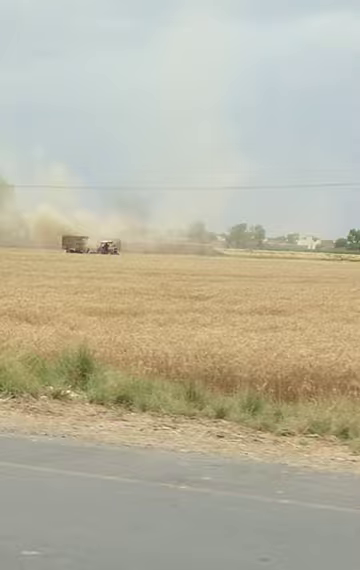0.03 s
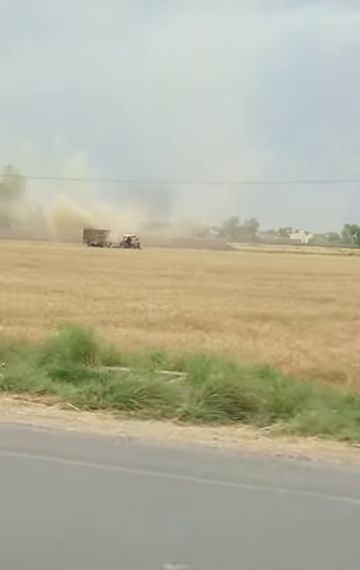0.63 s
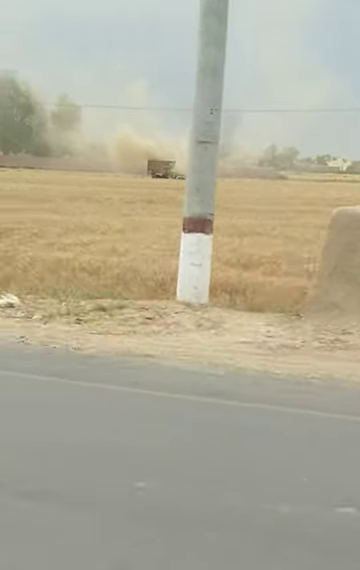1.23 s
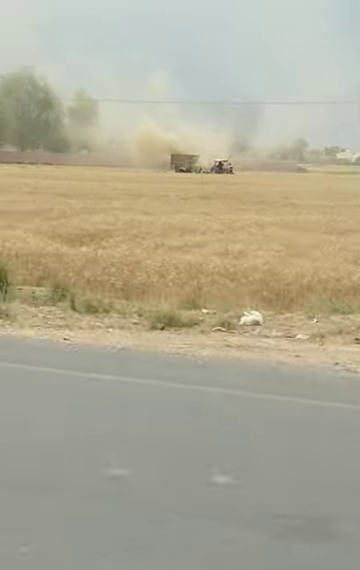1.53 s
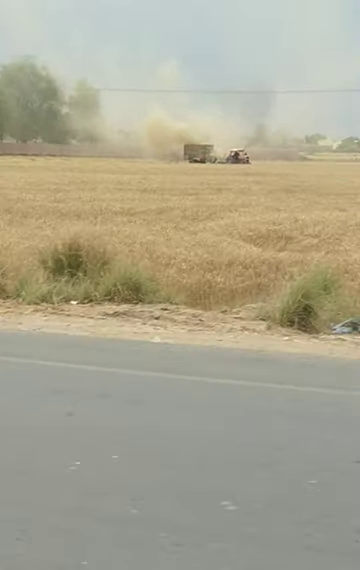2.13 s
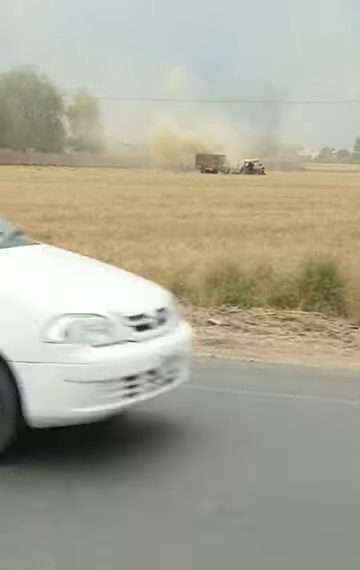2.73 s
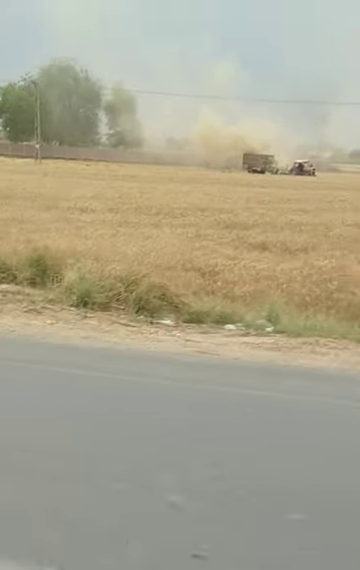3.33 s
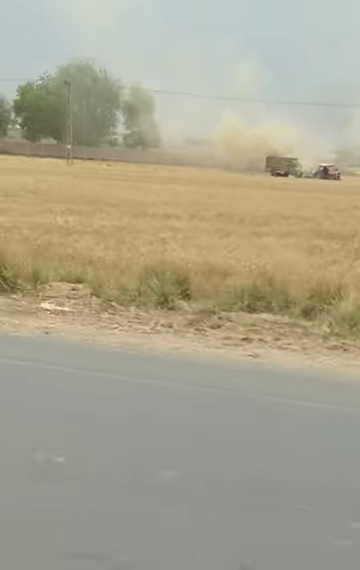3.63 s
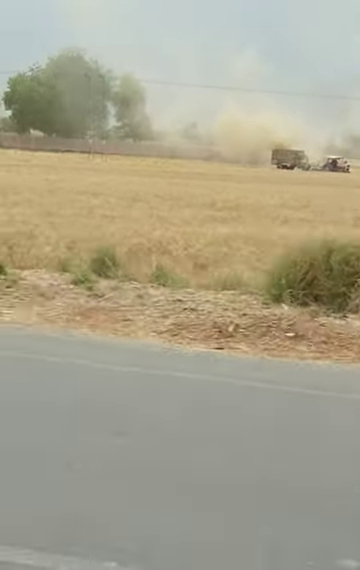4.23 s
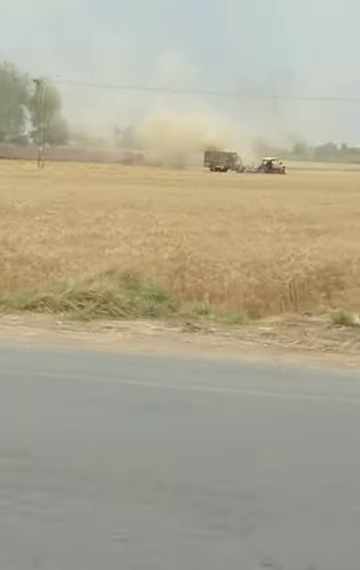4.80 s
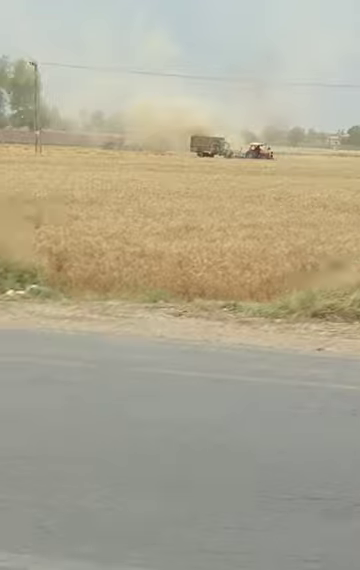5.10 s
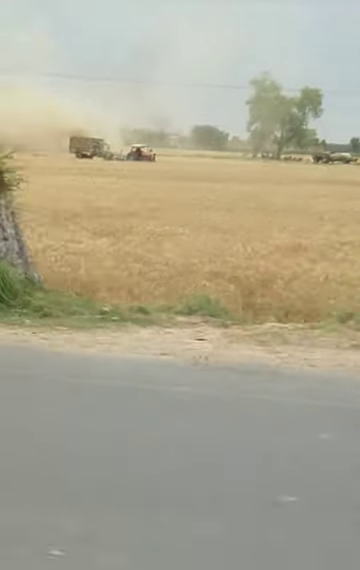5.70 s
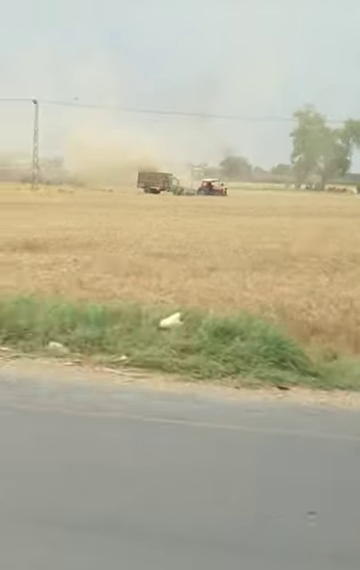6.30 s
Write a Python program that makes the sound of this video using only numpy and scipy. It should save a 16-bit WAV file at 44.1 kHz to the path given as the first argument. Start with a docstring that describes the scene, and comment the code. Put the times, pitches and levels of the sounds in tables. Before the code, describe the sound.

Wind rumbles and slaps at the microphone over a small moving vehicle's engine drone and road hiss, as a car briefly swishes by.

```python
"""A small single-cylinder vehicle drones along a country road at a steady speed.
Each firing rings its exhaust, while the valves clatter, the gears whine and the tyres hiss.
Wind rumbles on the two microphone openings (ports) of a phone held in the open air; it slaps
them in bursts and now and then chokes one for a moment. A car overtakes, and two ticks sound."""
import sys
import numpy as np
from scipy import signal
from scipy.fft import rfft, irfft, next_fast_len
from scipy.io import wavfile
from scipy.ndimage import uniform_filter1d, minimum_filter1d

SR = 44100
rng = np.random.default_rng(int(sys.argv[2]) if len(sys.argv) > 2 else 0)


def transcribe(signal):
    """Save signal, clipped to [-1, 1], as a 16-bit WAV file at the path in sys.argv[1]."""
    frames = np.atleast_2d(signal).T
    limited = np.clip(frames, -1, 1)
    pcm = np.round(limited * 32767).astype(np.int16)
    wavfile.write(sys.argv[1], SR, pcm)


N = 280035
TIME = np.arange(N) / SR


def engine(hiss_db, firing_hz=38.15, wander=0.01704, jitter=0.00902):
    """One cylinder fires at a slightly uneven rate, setting the pace of exhaust and valves."""
    cycles = np.cumsum(firing_hz * (1 + wander * walk(7) + jitter * walk(30))) / SR
    return exhaust(cycles) + valves(cycles, hiss_db)


def exhaust(cycles, gas_db=-14, scatter_db=2.5, throb_db=0.9):
    """A pulse at each firing and rushing gas ring the exhaust; each of its notes throbs on its own."""
    # notes at which the exhaust and body ring: pitch_hz, width_hz, level_db
    resonances = [(82, 7.6, -6.5), (116, 13.4, -11), (158.8, 19, -0.5), (189.5, 13.7, 4.5), (328, 60, -5.5),
                  (414, 8.8, -13.5), (640, 79, -18.5)]
    # how loud the drone is: time_s, level_db
    drone_levels = [(0, -12), (.7, -9.5), (1.15, -5), (1.35, -14.5), (1.62, -8), (1.85, -10.5), (2.1, -10),
                    (2.7, -7.5), (3.75, -9), (4, -6), (4.15, -10), (4.4, -7), (4.75, -14), (5.05, -9),
                    (5.6, -8), (6.3, -10.5)]
    firings = np.diff(np.floor(cycles), prepend=0)
    pulses = unit(firings * undb(scatter_db * walk(40)))
    flow = pulses + undb(gas_db) * rng.standard_normal(N)
    ringing = sum(undb(db + throb_db * walk(12)) * resonate(flow, hz, width)
                  for hz, width, db in resonances)
    # the silencer holds back the treble, and its chambers smear the bangs into a drone
    muffled = signal.sosfilt(signal.butter(2, [55, 800], "band", fs=SR, output="sos"), ringing)
    drone = unit(reflect(muffled, lag_s=.0093, share=0.36)) * undb(curves(drone_levels)[0])
    return ports(drone, left_db=-5.5, lag_s=0.0003)


def valves(cycles, hiss_db, clatter_db=3, depth=0.42):
    """The valves rattle twice per firing; the rattle swells and sinks along with the road hiss."""
    # tone of the clatter: pitch_hz, level_db
    clatter_colour = [(150, -16), (350, -11), (520, -7), (750, -1), (950, -12), (1250, 6), (2250, 3.5),
                      (3200, -10.5), (4200, -9.5), (7000, -19), (14000, -33)]
    beat = 1 + depth * np.cos(2 * np.pi * 2 * cycles)
    rattle = unit(noise(clatter_colour) * beat * undb(4.4 * np.tanh(walk(90))))
    return ports(rattle * undb(clatter_db + hiss_db), left_db=-5.5, lag_s=0.00043)


def wind(gust_db, wind_db, churn_db, eddy_db, eddy_spread_db):
    """Rough air at one port: a churning rumble, and small swirls (eddies) that crowd into the gusts."""
    # tone of the rumble and of the eddies: pitch_hz, level_db
    rumble_colour = [(20, -20), (38, -22), (62, -3), (110, -1.5), (170, -2.5), (240, -7.5), (400, -10.5),
                     (600, -29.5), (1000, -34.5), (2500, -61.5), (8000, -85)]
    eddy_colour = [(40, -24), (150, -5), (500, 0), (900, -10), (1600, -18), (3000, -27), (8000, -80)]
    rumble = unit(noise(rumble_colour) * undb(churn_db * walk(35)))
    eddies = unit(noise(eddy_colour) * undb(eddy_spread_db * np.tanh(walk(130) - 1) + 1.5 * gust_db))
    return rumble * undb(gust_db + wind_db) + undb(eddy_db) * eddies


def gusts(veer_per_s=9, left_veer_db=1.5, right_veer_db=1.83):
    """Wind strength in dB, left and right: as the flow veers, one port gains and the other loses."""
    # wind at the left port, which swings in and out of shelter: time_s, level_db
    left_gusts = [(.3, -17), (.6, -8.5), (.85, -22), (1.3, -8), (2.3, -9.5), (2.55, -19), (3.1, -13.5),
                  (3.4, -16), (3.65, -7), (4.0, -18.5), (4.15, -10.5), (4.85, -8), (5.2, -13), (5.4, -10),
                  (6.3, -8.5)]
    # wind at the right port, which always faces it: time_s, level_db
    right_gusts = [(.45, -6), (.7, -5.5), (2.2, -7.5), (2.7, -5), (3.16, -4), (3.22, -8.5), (3.7, -3),
                   (3.9, -5.5), (6.3, -6)]
    veer = walk(veer_per_s)
    return curves(left_gusts)[0] + left_veer_db * veer, curves(right_gusts)[0] - right_veer_db * veer


def buffets(buffet_db=6.0, eddy_s=.008, tail_hz=270, edge_hz=950, ragged=0.335, slacken=0.584):
    """Strong eddies slap one port: a steep, ragged front sinks into the rumble within milliseconds."""
    # single eddies: time_s, port (0 left, 1 right), front_pitch_hz (higher is sharper), level_db
    strong_eddies = [(.367, 1, 2800, -13), (.454, 1, 800, -14), (.582, 0, 2600, -8.5), (.669, 0, 800, -13),
                     (.701, 0, 1300, -14.5), (1.219, 0, 2800, -12), (1.256, 0, 1000, -12),
                     (1.271, 0, 1400, -14), (1.363, 0, 2400, -15), (1.403, 1, 1400, -11.5),
                     (1.411, 0, 2200, -14), (1.438, 0, 900, -12), (1.670, 0, 1500, -12),
                     (1.743, 0, 1500, -12), (1.757, 0, 3200, -8), (1.786, 0, 1500, -7),
                     (1.803, 0, 1100, -12), (1.829, 0, 2600, -11), (1.842, 0, 2200, -14),
                     (1.898, 0, 1200, -12), (2.006, 0, 1300, -11), (2.048, 0, 850, -13),
                     (2.383, 0, 1000, -10), (3.547, 0, 950, -12), (3.655, 0, 1100, -7.5),
                     (4.160, 0, 2800, -15), (4.178, 0, 3400, -12.5), (4.203, 0, 1400, -6),
                     (4.406, 0, 1100, -12.5), (4.428, 0, 1200, -14), (4.575, 0, 1100, -11.5),
                     (4.642, 1, 1400, -15), (4.670, 1, 1300, -13.5), (5.166, 1, 2500, -8.5),
                     (5.176, 1, 1900, -11), (5.215, 0, 1500, -11), (5.228, 1, 1100, -13),
                     (5.653, 0, 1300, -16), (5.821, 0, 1600, -16), (6.250, 1, 1800, -12),
                     (6.282, 0, 1700, -12)]
    out = np.zeros((2, N))
    progress = np.linspace(0, 1, int(eddy_s * SR))
    for time_s, port, front_hz, db in strong_eddies:
        smoothed = uniform_filter1d(rng.standard_normal(SR // 10), 20)
        wobble = unit(uniform_filter1d(smoothed, 20))[:len(progress)]
        hz = front_hz * (tail_hz / front_hz) ** progress ** slacken * np.exp(ragged * wobble)
        pressure = np.sin(2 * np.pi * (rng.random() + np.cumsum(hz) / SR))
        slap = pressure * signal.windows.tukey(len(progress), .45) / np.hypot(1, hz / edge_hz)
        start = int((time_s - eddy_s / np.pi) * SR)
        out[int(round(port)), start:start + len(slap)] += undb(buffet_db + db) * unit(slap)
    return out


def chokes():
    """Gain of each port: a surge of air pressure pins the microphone's membrane and briefly mutes it."""
    # choked moments: middle_s, port (0 left, 1 right), length_s, depth_db
    surges = [(.722, 1, .016, 26), (1.226, 1, .018, 12), (1.391, 1, .016, 28), (1.424, 1, .022, 28),
              (2.907, 1, .008, 16), (4.192, 0, .009, 18), (4.755, 1, .011, 12), (4.875, 1, .014, 14),
              (5.392, 0, .009, 28), (5.392, 1, .009, 28), (5.93, 1, .026, 24), (6.024, 1, .013, 15),
              (6.268, 1, .008, 20)]
    db = np.zeros((2, N))
    for middle_s, port, length_s, depth_db in surges:
        db[int(round(port))] -= depth_db * np.exp(-(2 * (TIME - middle_s) / length_s) ** 4)
    return undb(db)


def road(hiss_db, road_db=7.5, flutter_db=2.5):
    """Tyres roar and air hisses, fluttering in the air that streams past."""
    # tone of the hiss: pitch_hz, level_db
    road_colour = [(100, -13), (450, -11.5), (950, -1.5), (1300, 3.5), (2150, -0.1), (3200, -11.3),
                   (4200, -9.5), (5300, -16.5), (7000, -19.5), (9000, -18), (11000, -24), (13000, -34.5),
                   (15000, -76)]
    # how that tone changes at the left port: pitch_hz, change_db
    left_colour = [(300, 22.5), (1100, -2.5), (1600, -7.5), (2100, -12.5), (3200, -1), (4200, -9.5),
                   (5500, -1.5), (8500, -5), (12000, 3)]
    left, right = diffuse(road_colour, shared=0.17)
    hiss = np.array([colour(left, left_colour), right])
    return hiss * undb(road_db + hiss_db + flutter_db * np.tanh(walk(90)))


def hiss_level(surge_per_s=11, surge_db=0.93):
    """Rise and fall of the road hiss in dB: a slow drift, short swells and lulls, and random surges."""
    # slow drift of the hiss: time_s, level_db
    drift = [(.3, -34.5), (.7, -34.5), (1.14, -30), (1.42, -37.5), (1.53, -29.5), (1.8, -34.5),
             (2.1, -30.5), (2.45, -31.5), (2.7, -26.5), (3.17, -27), (3.21, -33), (3.4, -30), (4.15, -32.5),
             (4.35, -31), (4.72, -34), (5.1, -32), (5.8, -30.5), (6.3, -34.5)]
    # short swells and lulls: middle_s, length_s, change_db
    swells = [(1.245, .045, -3), (2.21, 0.053, 5.5), (2.85, 0.044, 2.5), (2.894, 0.023, -5),
              (3.765, 0.045, 5.5), (4.849, 0.035, 5), (5.026, 0.067, 5.5), (6.156, 0.067, 5.5)]
    swell_db = sum(db * np.exp(-(2 * (TIME - middle_s) / length_s) ** 2)
                   for middle_s, length_s, db in swells)
    return curves(drift)[0] + swell_db + surge_db * walk(surge_per_s)


def gears(unsteady=0.026):
    """Meshing gear teeth sing one tone, blurred by slack in the drive."""
    # the whine: time_s, pitch_hz, level_db
    whine = [(0, 1109, -33), (1.1, 1093, -32), (2.3, 1126, -32.5), (3.5, 1125, -34), (4.6, 1213, -34),
             (6.3, 1225, -35)]
    hz, db = curves(whine)
    turns = np.cumsum(hz * (1 + unsteady * walk(150))) / SR
    tone = np.sin(2 * np.pi * turns) * undb(2 * walk(50))
    return ports(unit(tone) * undb(db), left_db=-1.0, lag_s=0.00004)


def car(nearest_s=2.75, passing_s=0.17, car_db=-24.5, tread_hz=2300, doppler=0.096, tread_db=-5.0):
    """An overtaking car's tyres swell and fade with distance; their tread sings and falls in pitch."""
    # tone of its tyres: pitch_hz, level_db
    tyre_colour = [(200, 1), (900, -16), (1600, 9.5), (2400, -9), (3500, -2), (8000, -15), (14000, -43)]
    along = (TIME - nearest_s) / passing_s
    distance = np.hypot(1, along)  # 1 when the car is nearest
    hz = tread_hz * (1 - doppler * along / distance + 0.0227 * walk(300))
    tread = undb(tread_db) * np.sin(2 * np.pi * np.cumsum(hz) / SR)
    return (diffuse(tyre_colour, shared=0.32) + tread) * undb(car_db) / distance ** 2


def ticks(decay_s=0.00081):
    """Two dry, bright ticks, each a tiny burst of noise."""
    # the ticks: middle_s, level_db
    bursts = [(5.3971, -13.5), (5.412, -19)]
    loudness = sum(undb(db) * np.exp(-np.abs(TIME - middle_s) / decay_s) for middle_s, db in bursts)
    return loudness * rng.standard_normal((2, N))


def gain_control(x, knee_db=-12.5, slope=0.5, window_s=0.11, makeup_db=3):
    """The phone turns both ports down when the sound passes knee_db, so the hiss dips under gusts."""
    power = uniform_filter1d(np.mean(x ** 2, axis=0), int(window_s * SR))
    over_db = np.maximum(10 * np.log10(np.abs(power) + 1e-12) - knee_db, 0)
    return undb(makeup_db - slope * over_db)


def undb(db):
    """Turn decibels into a gain to multiply by."""
    return 10 ** (np.asarray(db) / 20)


def unit(x):
    """Scale to an average strength (rms) of 1."""
    return x / np.sqrt(np.mean(x ** 2))


def curves(rows):
    """Join a table's values by straight lines; its first column is the time."""
    times_s, *columns = np.transpose(rows)
    return [np.interp(TIME, times_s, column) for column in columns]


def colour(x, points):
    """Shape the tone of a sound by (pitch_hz, level_db) points."""
    size = next_fast_len(N + 4096)
    hz, db = np.transpose(points)
    bins_hz = np.maximum(np.arange(size // 2 + 1) * SR / size, 1)
    gain = undb(np.interp(np.log(bins_hz), np.log(hz), db))
    return irfft(rfft(x, size) * gain, size)[..., :N]


def noise(points):
    """Noise of strength 1 with the given tone."""
    return unit(colour(rng.standard_normal(N), points))


def walk(rate):
    """A smooth random wobble of strength 1 that changes about rate times a second."""
    hold = max(int(SR / rate), 1)
    steps = rng.standard_normal(N)[np.arange(N) // hold]
    return unit(uniform_filter1d(uniform_filter1d(steps, hold), hold // 2 + 1))


def resonate(x, hz, width):
    """Ring at one pitch, with a gain of 1 there."""
    return signal.lfilter(*signal.iirpeak(hz, hz / width, fs=SR), x)


def reflect(x, lag_s, share):
    """Repeated echoes spread a pulse in time and keep its tone."""
    echo = np.exp(-2j * np.pi * np.arange(N // 2 + 1) * SR / N * lag_s)
    return irfft(rfft(x) * (echo - share) / (1 - share * echo), N)


def ports(x, left_db, lag_s):
    """A sound from the right reaches the left port later and weaker."""
    return np.array([undb(left_db) * np.interp(TIME - lag_s, TIME, x), x])


def diffuse(points, shared):
    """Noise at two ports that have only a share of it in common."""
    common = noise(points)
    own = np.array([noise(points), noise(points)])
    return np.sqrt(shared) * common + np.sqrt(1 - shared) * own


def scene():
    """Vehicle, wind and road as they reach the two ports."""
    left_db, right_db = gusts()
    hiss_db = hiss_level()
    air = np.array([wind(left_db, wind_db=2.5, churn_db=2.0, eddy_db=-21.5, eddy_spread_db=14.5),
                    wind(right_db, wind_db=0.4, churn_db=1.0, eddy_db=-20.5, eddy_spread_db=11.5)])
    return (engine(hiss_db) + gears() + road(hiss_db) + car() + air + buffets()) * chokes() + ticks()


def record(dry, ceiling=1.0, hold_s=.003, top_hz=14000):
    """The phone fades in, evens the level, holds down each port's peaks and cuts the highest treble."""
    # level of the microphone as it opens: time_s, level_db
    fade_in = [(0, -72), (.066, -71), (.072, -21), (.16, -12.5), (.3, -8.5), (.4, -9)]
    x = dry * undb(curves(fade_in)[0])
    x = x * gain_control(x)
    hold = int(hold_s * SR)
    peak_gain = minimum_filter1d(np.minimum(1, ceiling / (np.abs(x) + 1e-9)), hold, axis=1)
    x = x * uniform_filter1d(peak_gain, hold, axis=1)
    return signal.sosfilt(signal.ellip(8, .2, 70, top_hz, fs=SR, output="sos"), x)


dry = scene()
out = record(dry)
transcribe(out)
```